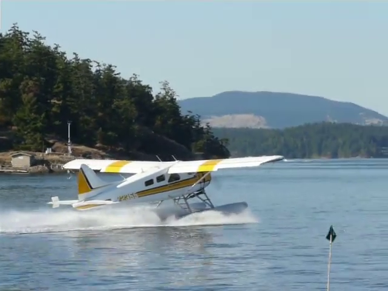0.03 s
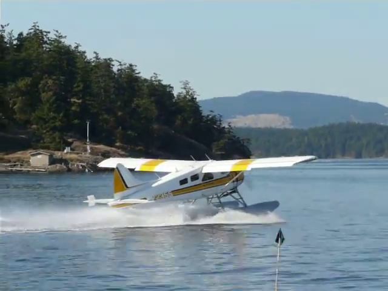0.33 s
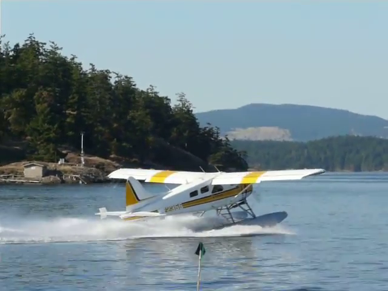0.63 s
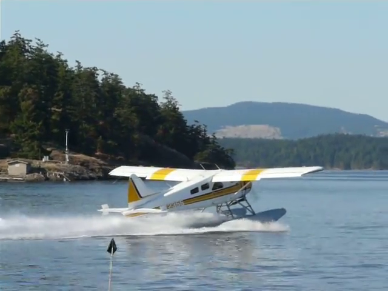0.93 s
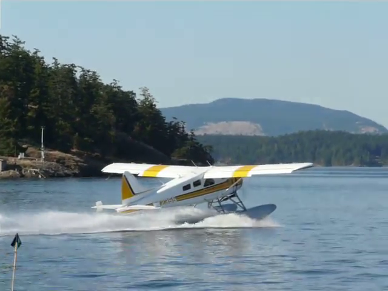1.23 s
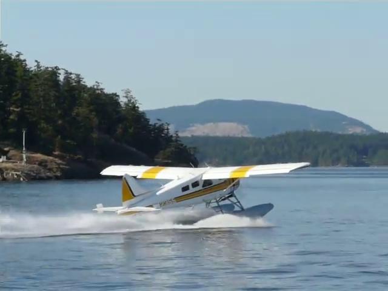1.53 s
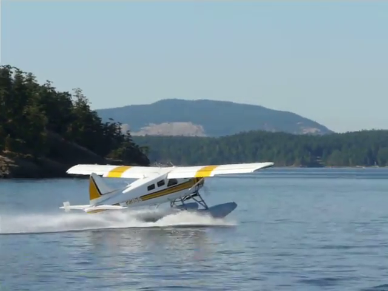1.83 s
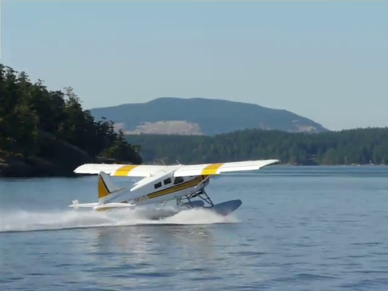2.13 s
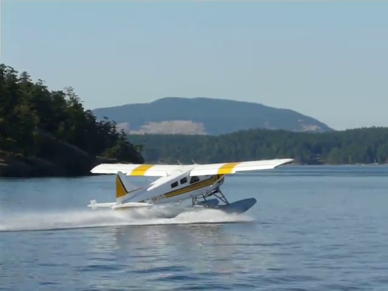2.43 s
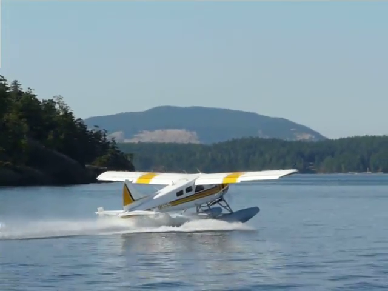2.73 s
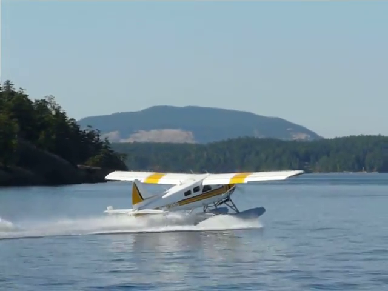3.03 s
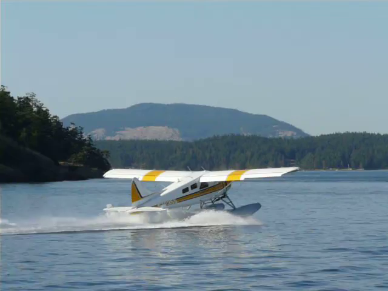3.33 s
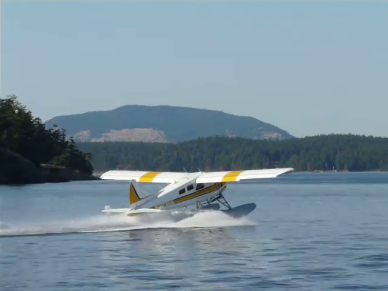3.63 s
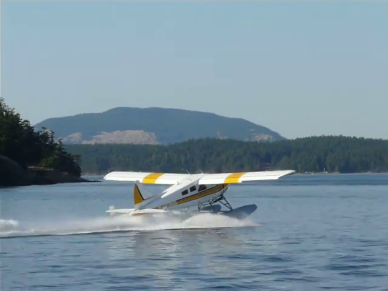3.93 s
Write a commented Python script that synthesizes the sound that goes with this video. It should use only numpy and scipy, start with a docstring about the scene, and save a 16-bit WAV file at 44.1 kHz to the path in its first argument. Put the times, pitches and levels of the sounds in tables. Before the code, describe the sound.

A propeller floatplane drones steadily past on the water, its pitch sagging slightly.

```python
"""A floatplane runs past at take-off power on calm water, some way off from the microphone.
Its nine-cylinder radial engine puffs unevenly, so the drone throbs once per engine cycle; the
three-blade propeller hums and slaps, the exhaust rasps and spray hisses over a low rumble.
As the plane comes abeam the pitch sags and the exhaust turns deeper. The camera microphone keeps
only a narrow band. Near the end the sound skips once, with a dry tick."""
import sys
import numpy as np
from scipy import signal
from scipy.fft import rfft, irfft, next_fast_len
from scipy.io import wavfile
from scipy.ndimage import uniform_filter1d, map_coordinates

SR = 44100
rng = np.random.default_rng(int(sys.argv[2]) if len(sys.argv) > 2 else 0)


def put_to_file(sound):
    """Save the sound as 16-bit audio at rate SR, in the file named by the first command-line argument."""
    columns = np.atleast_2d(sound).T  # one column per channel
    safe = np.clip(columns, -1, 1)
    whole_steps = np.round(safe * 32767)
    wavfile.write(sys.argv[1], SR, whole_steps.astype(np.int16))


N = 176400

CYLINDER_COUNT, BLADE_ORDER = 9, 6  # firings and blade passes per engine cycle (two shaft turns)
SKIP_S, SKIP_CYCLES = 3.387, 0.425  # when the sound skips, and how far the engine's rhythm jumps
# The pass as heard from the microphone: (time [s], exhaust gain [dB], how far abeam [0-1])
PASS_BY = [(0, 3.9, 0.66), (.3, 1, 0), (.7, 0.15, 0.14), (1.05, -.7, 0.11), (1.25, -1.7, 0), (1.7, -1.4, 0),
           (1.97, -0.5, 0.28), (2.12, -0.4, 0.19), (2.5, -.5, 0.72), (2.8, 0.7, 1), (4, -.5, 0.87)]
# The cylinders in firing order: (puff lag [firing intervals], puff gain ahead [dB],
# puff gain abeam [dB], rasp lag [firing intervals], rasp gain [dB])
CYLINDER_PUFFS = [(1.059, 1.4, 3.8, 0.0, 0.0), (0.946, 5.7, 7.6, 0.08, 0.0), (0.15, 3.1, 7.7, 0.0, -3.0),
                  (0.648, 5.2, 6.0, -0.12, -1.0), (0.581, 1.0, 1.5, 0.27, 2.0),
                  (0.926, -0.4, -3.7, 0.13, 2.0), (0.49, -7.1, -5.5, 0.12, 1.5),
                  (1.1, -4.9, -8.5, 0.29, 0.0), (0.607, -4.0, -8.8, 0.0, -4.0)]
# Colour of both the exhaust rasp and the spray: (frequency [Hz], gain [dB])
HISS_COLOUR = [(760, -24), (1300, -5), (1440, -7.5), (2000, 0), (2370, -1), (2650, -4.5), (3180, 2),
               (3910, -8), (4070, -12), (4300, -27), (5590, -52), (9460, -120)]


def amp(db):
    """Decibels to gain."""
    return 10 ** (np.asarray(db) / 20)


def unit(x):
    """x scaled to rms 1."""
    return x / np.sqrt(np.mean(x ** 2) + 1e-20)


def along(points, hz):
    """(frequency, value) points read off at hz on a log axis."""
    freqs, values = np.transpose(points)
    return np.interp(np.log(hz + 1), np.log(freqs + 1), values)


def curves(rows):
    """One value per sample for each column after the time."""
    times, *columns = np.transpose(rows)
    return [np.interp(np.arange(N) / SR, times, column) for column in columns]


def wobble(rate):
    """A smooth random curve with rate knots a second."""
    return map_coordinates(rng.standard_normal(1024), [np.arange(N) * rate / SR], mode="mirror")


def filtered(x, response):
    """x through a filter whose gain is response(hz)."""
    size = next_fast_len(N + SR // 4)
    return irfft(rfft(x, size) * response(np.fft.rfftfreq(size, 1 / SR)), size)[:N]


def lowpassed(x, top_hz):
    """x cut off steeply above top_hz."""
    return filtered(x, lambda hz: 1 / np.sqrt(1 + (hz / top_hz) ** 120))


def coloured(x, colour, patchy_db):
    """x in the given colour at rms 1, with drifting patches of gain."""
    frames = signal.stft(x, nperseg=1024)[2]
    patches = uniform_filter1d(rng.standard_normal(frames.shape), 6, axis=0)
    patches = unit(uniform_filter1d(patches, 14, axis=1))
    patchy = signal.istft(frames * amp(patchy_db * patches), nperseg=1024)[1][:N]
    return unit(filtered(patchy, lambda hz: amp(along(colour, hz))))


def turbulence(cycle, repeat_share):
    """White noise of which a share comes back alike in every engine cycle."""
    one_cycle = rng.standard_normal(int(N / cycle[-1]))
    alike = map_coordinates(one_cycle, [cycle % 1 * len(one_cycle)], mode="grid-wrap")
    return np.sqrt(repeat_share) * unit(alike) + np.sqrt(1 - repeat_share) * rng.standard_normal(N)


def rumble():
    """Air and water lay a low, gently wavering bed under the plane."""
    # Colour of the rumble: (frequency [Hz], gain [dB])
    rumble_colour = [(20, -18), (40, -11), (60, -6), (90, 1.5), (140, -1), (230, -1), (330, -1), (450, -2),
                     (560, -7), (750, -22), (1500, -60)]
    return amp(-35.5 + 0.64 * wobble(5)) * coloured(rng.standard_normal(N), rumble_colour, patchy_db=1.5)


def spray():
    """Spray from the floats hisses evenly beneath the rasp."""
    return amp(-1.5) * coloured(rng.standard_normal(N), HISS_COLOUR, patchy_db=3)


def propeller(cycle, abeam):
    """A wash of churned air, and one slap per shaft turn that fades as the plane comes abeam."""
    # Colour of the slap: (frequency [Hz], gain [dB])
    slap_colour = [(400, -37), (600, -8), (740, -4.5), (820, 9.5), (1050, -5), (1400, -8), (2500, -32)]
    # Colour of the churned air: (frequency [Hz], gain [dB])
    wash_colour = [(350, -31.5), (560, -5), (700, 2.5), (770, -2), (900, 2.5), (1100, 1), (1300, -5.5),
                   (1500, -21.5), (2000, -44)]
    # Gain on slap and wash together: (time [s], gain [dB])
    propeller_gain = [(0, -40), (.6, -41), (1.3, -42), (1.75, -41), (2.1, -43.5), (3, -42), (4, -40.5)]
    gain_db, = curves(propeller_gain)
    turns = np.floor(2 * cycle - 0.57 + 0.0031 * wobble(40))  # steps up about 0.57 into each turn
    impulses = np.diff(turns, prepend=turns[0])
    slap = amp(-10 - 6.5 * abeam) * coloured(impulses, slap_colour, patchy_db=4)
    wash = amp(-0.64) * coloured(turbulence(cycle, repeat_share=0.12), wash_colour, patchy_db=0.5)
    return amp(gain_db) * (slap + wash)


def blade_buzz(cycle, abeam, fade_db, flutter_db):
    """The blade tips throw a faint pitched edge forward, so it fades as the plane comes abeam."""
    # Overtones of the blade rate: (multiple [-], level from ahead [dB])
    overtones = [(6, -52.5), (7, -47.5), (8, -51.5), (9, -51.5), (10, -55)]
    blade_phase = 2 * np.pi * BLADE_ORDER * cycle
    buzz = sum(amp(db + flutter_db * wobble(4)) * np.sin(k * blade_phase) for k, db in overtones)
    return buzz * amp(-fade_db * abeam)


def exhaust_rasp(cycle):
    """Each cylinder lets out a ragged burst of hiss as it fires."""
    burst_width = 0.28  # in firing intervals
    gate = np.zeros(N)
    for i, (_, _, _, lag, db) in enumerate(CYLINDER_PUFFS):
        from_burst = ((cycle - (i + lag) / CYLINDER_COUNT + 0.5) % 1 - 0.5) * CYLINDER_COUNT
        gate += amp(db) * np.exp(-0.5 * (from_burst / burst_width) ** 2)
    bursts = turbulence(cycle, repeat_share=0.22) * gate * amp(2.2 * wobble(130))
    return amp(-3) * coloured(bursts, HISS_COLOUR, patchy_db=1.6)


def deep_tones(cycle, waver_db):
    """The firing rate and the blade rate each hum as a clean, deep tone."""
    # The two tones over the pass: (time [s], firing level [dB], blade level [dB])
    tone_levels = [(0, -26, -34.5), (.45, -27, -30.5), (.75, -33.5, -36.5), (1.05, -31, -34.5),
                   (1.4, -26, -35), (1.75, -27, -35.5), (2.05, -25.5, -31.5), (2.6, -25.5, -35),
                   (3.1, -24.5, -36), (4, -25.5, -34.5)]
    firing_db, blade_db = curves(tone_levels)
    firing_phase = 2 * np.pi * (CYLINDER_COUNT * cycle - 0.23)  # lags by 0.23 of a firing interval
    firing = amp(firing_db + waver_db * wobble(8.6)) * np.sin(firing_phase)
    blades = amp(blade_db + waver_db * wobble(2.9)) * np.sin(2 * np.pi * BLADE_ORDER * cycle)
    return blades - firing


def exhaust_drone(cycle, speed, abeam, flutter_db, unsteady_db):
    """Nine uneven puffs a cycle sound through the pipe; their balance shifts as the plane passes."""
    # Response of the exhaust pipe from ahead: (frequency [Hz], gain [dB])
    pipe_ahead = [(133.0, -62.0), (190.0, -64.5), (230.0, -51.0), (270.0, -34.6), (315.0, -37.0),
                  (385.0, -46.1), (425.0, -33.6), (480.0, -46.8), (520.0, -56.2), (560.0, -62.6),
                  (700.0, -70.0)]
    # Response of the exhaust pipe from abeam: (frequency [Hz], gain [dB])
    pipe_abeam = [(133.0, -70.3), (190.0, -53.8), (230.0, -47.9), (270.0, -42.5), (315.0, -48.1),
                  (385.0, -48.6), (425.0, -39.6), (480.0, -56.4), (520.0, -59.0), (560.0, -66.9),
                  (700.0, -70.0)]
    lag, ahead_db, abeam_db, _, _ = np.transpose(CYLINDER_PUFFS)
    puff_at = (np.arange(CYLINDER_COUNT) + lag) / CYLINDER_COUNT
    drone = np.zeros(N)
    for order in np.setdiff1d(np.arange(7, 36), CYLINDER_COUNT):  # deep_tones plays the firing rate
        puffs = np.exp(-2j * np.pi * order * puff_at)
        front = puffs @ amp(ahead_db) * amp(along(pipe_ahead, order * speed[0]))
        side = puffs @ amp(abeam_db) * amp(along(pipe_abeam, order * speed[-1]))
        strength = (1 - abeam) * abs(front) + abeam * abs(side)
        phase = np.angle((1 - abeam) * front + abeam * side)
        drone -= strength * amp(flutter_db * wobble(6.5)) * np.cos(2 * np.pi * order * cycle + phase)
    surge_db = 1.3 * np.cos(2 * np.pi * (cycle - 0.3))  # one swell per cycle
    return drone * amp(surge_db + unsteady_db * wobble(25))


def scene():
    """The plane from across the water: one shaft drives engine and propeller, over spray and rumble."""
    # Engine speed as heard at the microphone: (time [s], speed [cycles/s])
    engine_speed = [(0.0, 19.144), (0.4, 19.182), (1.0, 19.143), (1.7, 19.134), (2.1, 19.052),
                    (2.4, 18.705), (2.8, 18.345), (3.3, 18.25), (4, 18.45)]
    # Gain on rasp and spray together: (time [s], gain [dB])
    hiss_gain = [(0, -38), (.16, -36), (.27, -38.7), (.37, -37.5), (.65, -40), (1.2, -38.5), (1.36, -41.5),
                 (1.52, -36), (1.87, -36.5), (2, -39), (2.6, -39.5), (2.85, -38.5), (3.05, -39.5),
                 (3.3, -38.3), (3.8, -41.8), (4, -41)]
    speed, = curves(engine_speed)
    hiss_db, = curves(hiss_gain)
    exhaust_db, abeam = curves(PASS_BY)
    cycle = np.cumsum(speed) / SR + SKIP_CYCLES * (np.arange(N) / SR > SKIP_S)
    bed = rumble()
    exhaust = amp(exhaust_db) * exhaust_drone(cycle, speed, abeam, flutter_db=0.68, unsteady_db=0.9)
    hum = deep_tones(cycle, waver_db=0.67)
    blades = propeller(cycle, abeam) + blade_buzz(cycle, abeam, fade_db=7.5, flutter_db=1.5)
    hiss = (exhaust_rasp(cycle) + spray()) * amp(hiss_db + 0.2 * wobble(12))
    return (bed + hiss + blades + hum + exhaust)[None]


def skip_tick(decay_s, low_cut_hz):
    """A thin, dry tick where the sound skips."""
    since = np.arange(N) / SR - SKIP_S
    jump = amp(-17) * (since > 0) * np.exp(-abs(since) / decay_s)
    return filtered(jump, lambda hz: hz / np.hypot(hz, low_cut_hz))


def record(dry):
    """The camera microphone keeps a narrow band, in mono; only the tick reaches higher."""
    narrow = lowpassed(dry[0], top_hz=4457)
    tick = skip_tick(decay_s=0.0006, low_cut_hz=3200)
    return lowpassed(narrow + tick, top_hz=16000)[None]


dry = scene()
out = record(dry)
put_to_file(out)
```